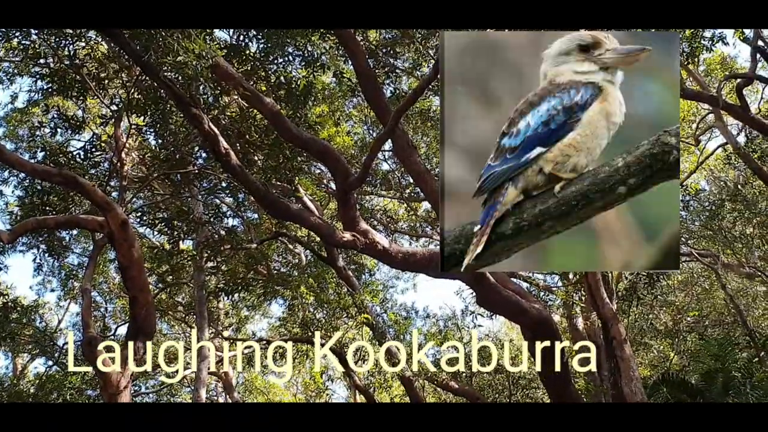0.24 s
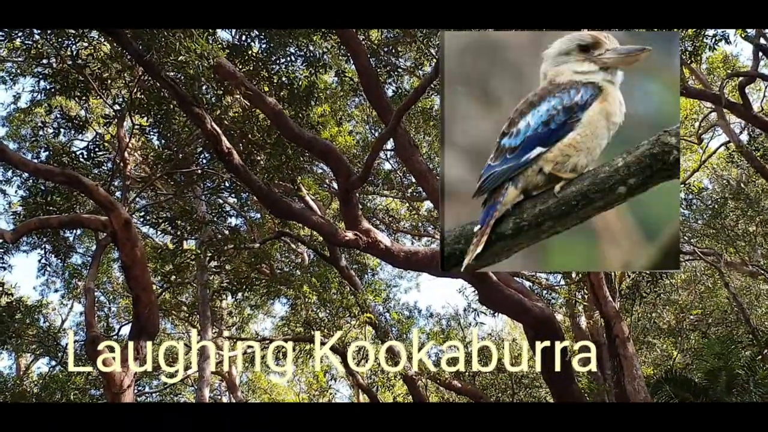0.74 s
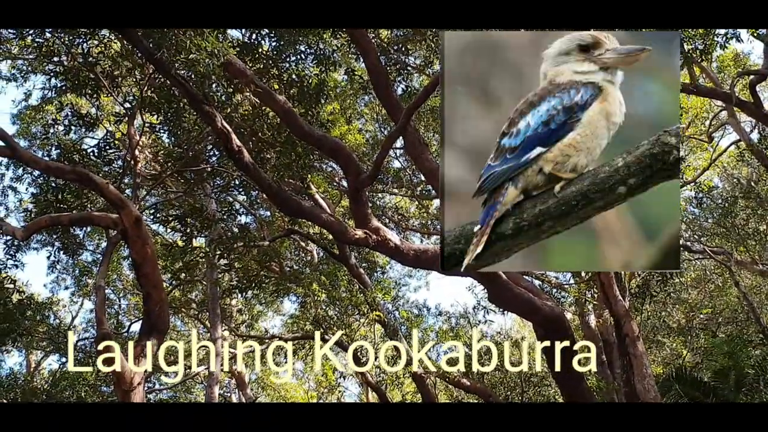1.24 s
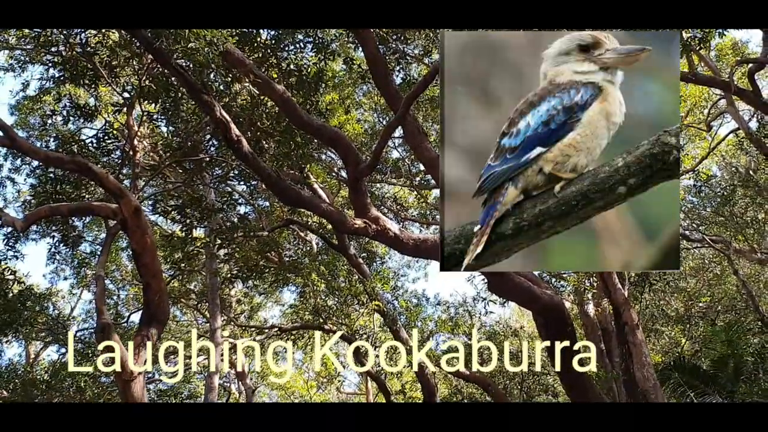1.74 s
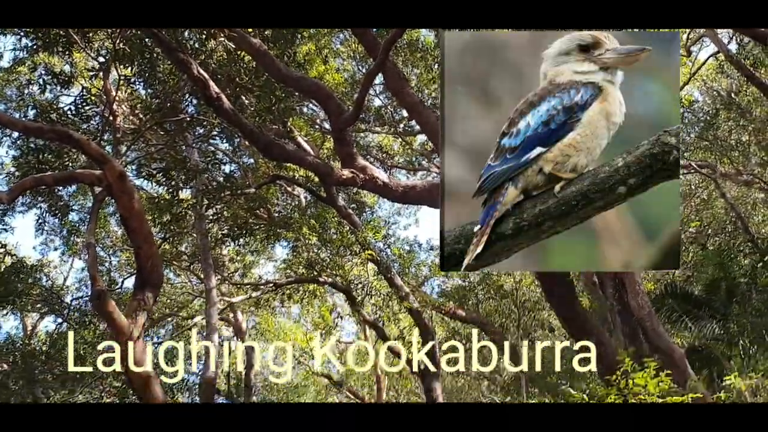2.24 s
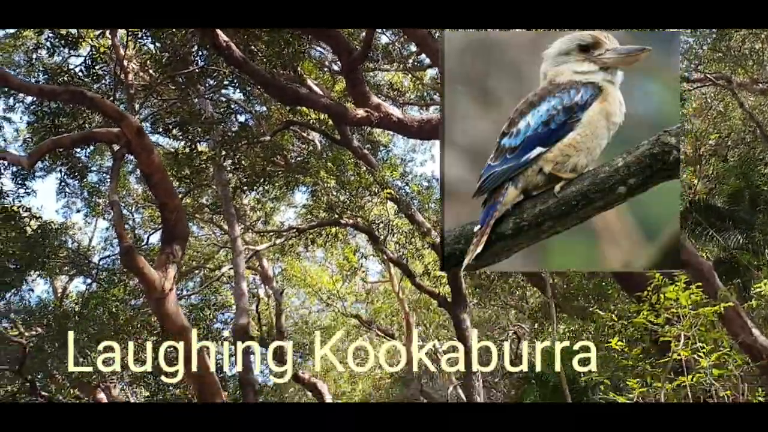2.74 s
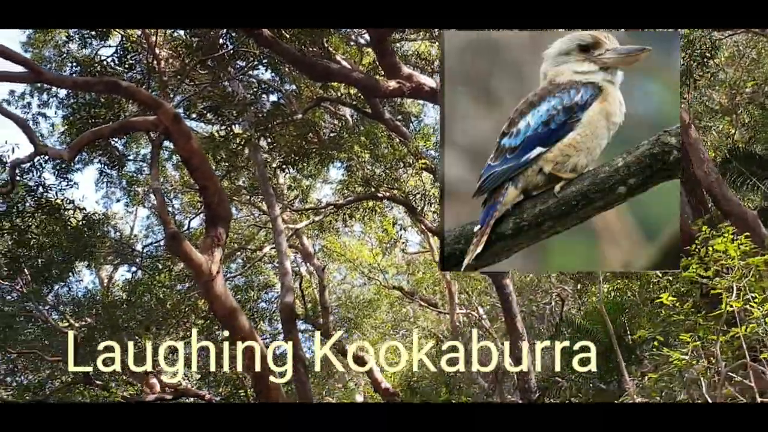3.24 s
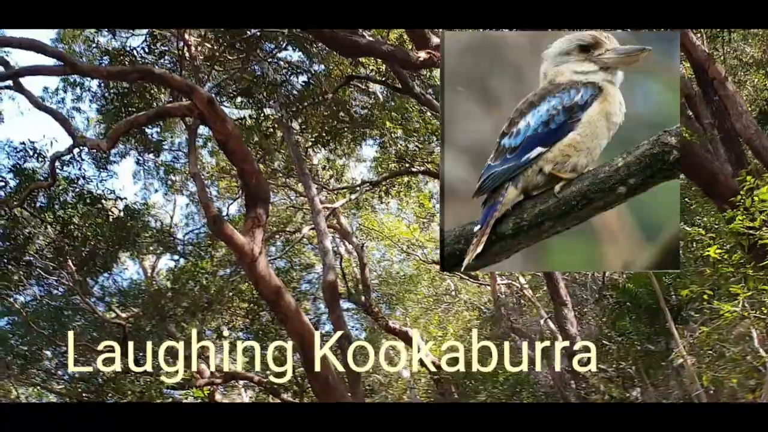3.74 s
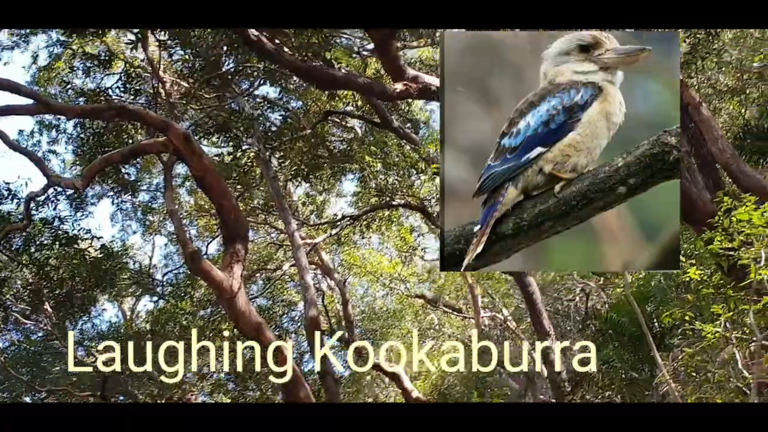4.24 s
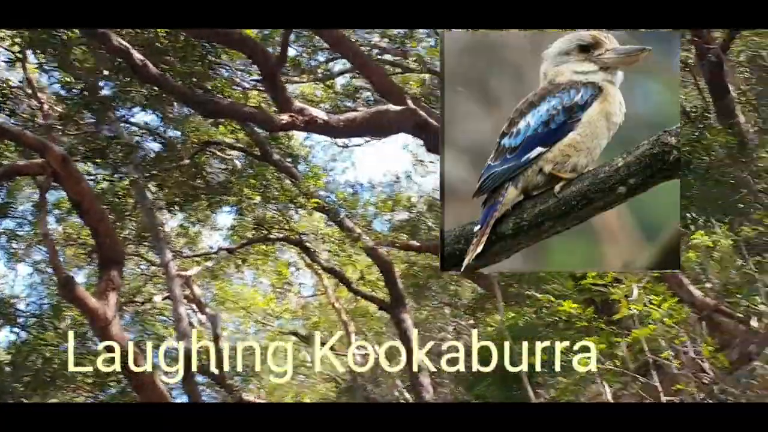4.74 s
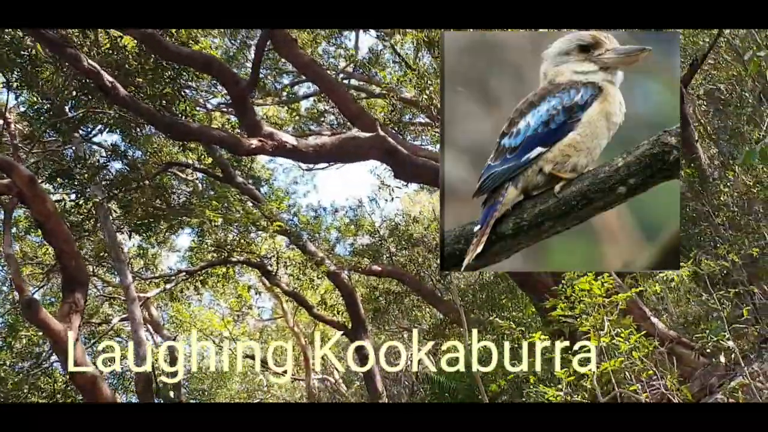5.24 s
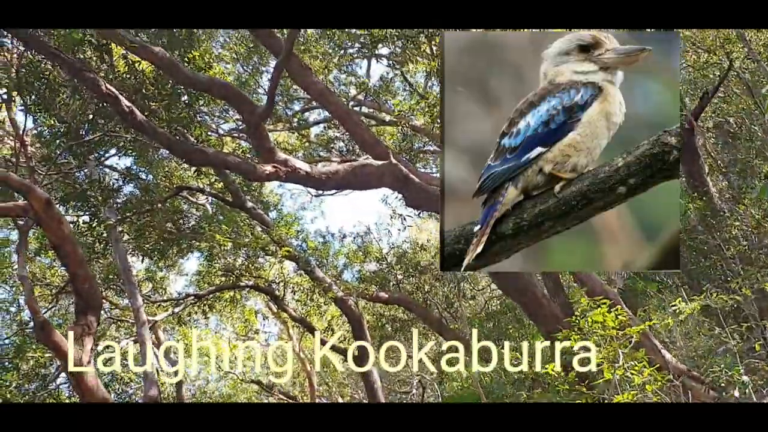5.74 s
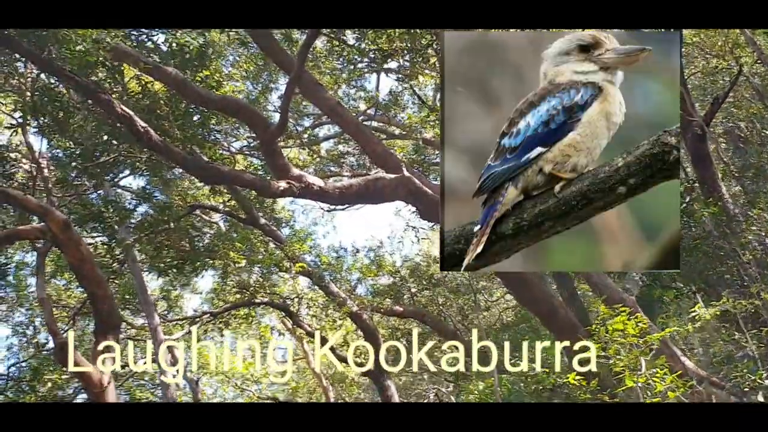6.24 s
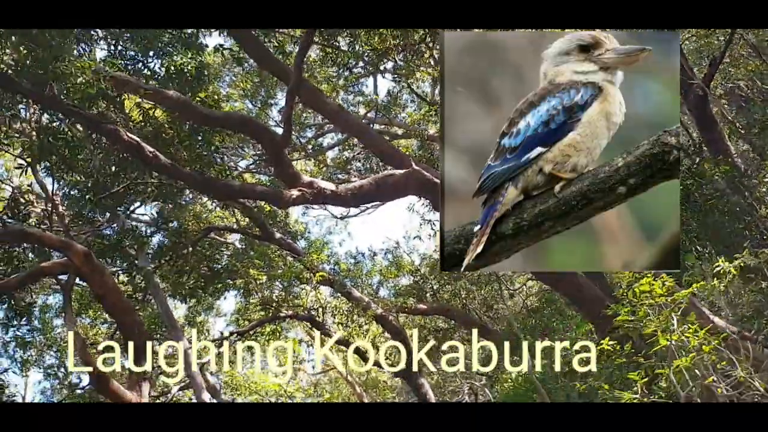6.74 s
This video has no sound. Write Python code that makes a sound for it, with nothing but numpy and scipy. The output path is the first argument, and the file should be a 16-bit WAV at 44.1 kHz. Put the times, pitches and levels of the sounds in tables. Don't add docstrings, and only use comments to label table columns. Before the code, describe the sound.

Harsh overlapping laughing bird calls ring off trees to the right, thinning to two falling hoots; a handling knock clunks close by early on.

```python
import sys
import numpy as np
from scipy import signal
from scipy.fft import rfft, irfft, next_fast_len
from scipy.io import wavfile
from scipy.ndimage import uniform_filter1d, map_coordinates

SR = 44100
rng = np.random.default_rng(int(sys.argv[2]) if len(sys.argv) > 2 else 0)


def generate_wav(sig):
    pcm = np.round(np.clip(np.atleast_2d(sig).T, -1, 1) * 32767).astype(np.int16)
    wavfile.write(sys.argv[1], SR, pcm)


def invert_db(x):
    u = np.asarray(x, float) / 20
    return 10 ** u


N = 308700
TIME = np.arange(N) / SR


def unit(x):
    return x / np.sqrt(np.mean(x ** 2) + 1e-20)


def along(points, hz):
    f, v = np.transpose(points)
    return np.interp(np.log(hz + 1), np.log(f + 1), v)


def wobble(rate):
    coarse = TIME[::SR // 4000]
    knots = rng.standard_normal(int(N * rate / SR) + 4)
    return np.interp(TIME, coarse, map_coordinates(knots, [coarse * rate]))


def filtered(x, response):
    m = next_fast_len(N + 8192)
    return irfft(rfft(x, m) * response(np.fft.rfftfreq(m, 1 / SR)), m)[..., :N]


def coloured(spectrum, channels):
    noise = rng.standard_normal((channels, N))
    return unit(filtered(noise, lambda hz: invert_db(along(spectrum, hz))))


def throat_response(modes):
    def response(f):
        total = 0
        for k, (centre, width, db) in enumerate(modes):
            resonance = 1j * f * width / (centre * centre - f * f + 1j * f * width)
            total = total + (-1) ** k * invert_db(db) * resonance ** 2
        return total
    return response


def shaped(rows, shape, high_hz=None, bright_db=0):
    step = 2 ** (1 / 12)
    notes = []
    for row in rows:
        if high_hz:
            start, length, low, effort, bright = row
            high = high_hz
        else:
            start, length, low, effort, high = row
            bright = bright_db
        notes.append([(start + share * length, low * step ** bend, high * step ** lift, effort + db, bright + shine)
                      for share, bend, lift, db, shine in shape])
    return notes


def voice(notes, tone, throat, jitter_hz, throb_hz, throb, air_db, rise, fall):
    s, *cols = np.transpose([row for note in notes for row in note])
    low_hz, high_hz, effort_db, bright_db = [
        uniform_filter1d(np.interp(TIME, s, c), size=SR // 30) for c in cols]
    sounding = 0
    for note in notes:
        opening = np.clip((TIME - note[0][0]) / rise + .5, 0, 1)
        closing = np.clip((note[-1][0] - TIME) / fall + .5, 0, 1)
        sounding = sounding + opening * closing

    cycles = np.cumsum(throb_hz * (1 + .15 * wobble(30))) / SR
    starts = np.array([note[0][0] for note in notes])
    latest = starts[np.clip(np.searchsorted(starts, TIME + rise) - 1, 0, None)]
    beat = np.cos(2 * np.pi * (cycles - np.interp(latest + rise, TIME, cycles)))
    flap = 1 - throb * (1 - beat)

    low, high = [2 * np.pi * np.cumsum(hz + hz / low_hz * jitter_hz * wobble(160)) / SR
                 for hz in (low_hz, high_hz)]
    body = sum(invert_db(db + 2.68 * wobble(60)) * np.sin(k * low) for k, db in tone[0])
    shine = sum(invert_db(db + 4.5 * wobble(90)) * np.sin(k * high + .42 * k * k * wobble(330)) for k, db in tone[1])
    breath = (2.9 + .5 * flap) * rng.standard_normal(N)
    air = unit(filtered(breath, throat_response(throat))) * invert_db(air_db)
    return sounding * invert_db(effort_db) * (2.06 * flap * body + invert_db(bright_db) * (0.47 * shine + air))


# pitch_hz, t60_s
TRUNK_DECAY = [(500, 1), (1300, 1), (2200, 1), (5000, 0.99), (10000, 0.22)]


def woodland(x, pan_db, wet_db):
    near, near_t60 = 2.2, .15
    out = np.zeros((2, N + 2 * SR))
    hop = SR // 5
    fade = np.hanning(2 * hop)
    padded = np.pad(x, (hop, 2 * hop))
    for i in range(0, N + hop, hop):
        noise = rng.standard_normal((2, SR // 2))
        hz, t, z = signal.stft(noise, SR, nperseg=256)
        decay = invert_db(-60 * t / along(TRUNK_DECAY, hz)[:, None]) + near * invert_db(-60 * t / near_t60)
        tail = signal.istft(z * decay, SR, nperseg=256)[1]
        tail = tail / np.linalg.norm(tail[0])
        wet = signal.fftconvolve((padded[i:i + 2 * hop] * fade)[None], tail, axes=1)
        out[:, i:i + wet.shape[1]] += wet
    scatter = out[:, hop - 130:hop - 130 + N]
    direct = np.array([np.roll(x, 1), x])
    return (direct + invert_db(wet_db) * scatter) * invert_db([[pan_db / 2], [-pan_db / 2]])


# pitch_hz, level_db
BACKGROUND_COLOUR = [(20, -48), (50, 0.5), (120, -9), (300, -10.5), (900, -9.5), (1300, 4.5), (2500, -7),
                     (4500, -25.5), (7500, -35.5), (11000, -30.5), (15000, -30.5), (17000, -120)]


def bush():
    a, b = coloured(BACKGROUND_COLOUR, channels=2)
    return invert_db(-41 + 0.64 * wobble(1.5)) * np.array([0.69 * a + 0.3 * b, b])


# start_s, length_s, low_membrane_hz, effort_db, brightness_db
RASPS = [
    (-.3, 0.35, 1155, -24, -1.5),
    (.4, .43, 1250, -21.5, -6.5),
    (1.15, .4, 1177, -21, -3.5),
    (1.85, 0.39, 1207, -21.5, -5.5),
    (2.5, .45, 1184, -21.5, -4.5),
    (3.15, .47, 1214, -19.5, -7),
    (3.96, 0.33, 1198, -17.5, -8),
    (4.7, 0.37, 1163, -19, -7),
]
# start_s, length_s, low_membrane_hz, effort_db,
# brightness_db
CROAKS = [
    (5.745, 0.083, 1183, -20.5, -1.5),
    (6.165, 0.104, 1172, -24, 0),
]
# share_of_length, low_bend_semitones, high_bend_semitones, effort_db, brightness_db
DRAWL = [(0, 0, 0.026, 0.5, -2.5), (.5, -.8, 0.009, 1, -0.5), (.75, -1.1, .6, -4.5, 5),
         (1, -1.6, 1.1, -14, 12.5)]
# share_of_length, low_bend_semitones, high_bend_semitones, effort_db, brightness_db
SINK = [(0, 0, -.9, 3.5, -5.5), (.5, -2.5, 0, -11.5, -2), (1, -3.5, 0, -26.5, 21)]
# multiple, level_db
RASP_TONE = [
    [(.72, -13.5), (.85, -10), (1, 1)],
    [(1, -5.5), (1.13, -16.5), (1.4, -12.5), (1.95, -13)],
]
# pitch_hz, width_hz, level_db
RASP_THROAT = [(1066, 495, 9.5), (2686, 760, 5), (3520, 640, 1), (4903, 794, 3.5), (8030, 1370, -21),
               (9510, 810, -17.5), (12200, 2600, -32)]


def rasping_bird():
    notes = shaped(RASPS, DRAWL, high_hz=2540) + shaped(CROAKS, SINK, high_hz=3060)
    rasp = voice(sorted(notes), RASP_TONE, RASP_THROAT, jitter_hz=24, throb_hz=40, throb=.62,
                 air_db=1, rise=.025, fall=.07)
    return invert_db(-6.5) * woodland(rasp, pan_db=-5.5, wet_db=1)


# start_s, left_level_db, right_level_db, ring_hz, sharpness_0_to_1
KNOCKS = [
    (.0664, -25, -21, 2000, 1),
    (1.1128, -2, -20, 1450, 1),
    (1.1309, 2, -12, 1300, .25),
    (1.1328, 3, -12, 1600, .25),
    (6.826, -40, -38, 2000, 1),
]
# start_s, level_db
RUB = [
    (6.972, -75),
    (6.982, -36.5),
    (6.99, -41.5),
    (7, -48),
]
# pitch_hz, level_db
RUB_COLOUR = [(150, -120), (300, 4.5), (600, -7.5), (1500, -13.5), (5000, -23.5), (8000, -23), (11000, -12),
              (14500, -12.5), (17000, -120)]


def handling():
    out = np.zeros((2, N))
    for start, left_db, right_db, hz, sharp in KNOCKS:
        t = np.clip(TIME - start, -.01, .3)
        tick = np.cos(2 * np.pi * hz * t + 1.3) + .5 * np.cos(2 * np.pi * 2.7 * hz * t)
        tick += 0.46 * sharp * np.cos(2 * np.pi * 7.1 * hz * t) * np.exp(-(t / 0.00017) ** 2)
        thud = invert_db(-29 - 60 * t / 0.11) * np.sin(2 * np.pi * 75 * t)
        thud += invert_db(-32 - 60 * t / .03) * np.sin(2 * np.pi * 320 * t)
        thud += invert_db(-25 - 60 * t / .1) * np.sin(2 * np.pi * 165 * t)
        knock = .6 * np.exp(-(t / .00035) ** 2) * tick + .5 * (t > 0) * thud
        out += invert_db([[left_db], [right_db]]) * knock
    rub_db = np.interp(TIME, *np.transpose(RUB), left=-120) + 4.3 * wobble(240)
    rub = invert_db(rub_db) * coloured(RUB_COLOUR, channels=2)
    return out + rub * invert_db([[-5], [3]])


# start_s, length_s, left_level_db,
# right_level_db
PUFFS = [(0.071, 0.082, -38.5, -45.5), (0.264, 0.05, -22.5, -38.5), (0.615, 0.1, -38.5, -59),
         (1.991, 0.075, -41.5, -59), (2.403, 0.047, -46, -67), (2.562, 0.12, -42.5, -51.5),
         (3.162, 0.096, -53, -62), (3.528, 0.1, -65, -55), (3.662, 0.095, -47, -66),
         (4.091, 0.093, -45, -73), (4.272, 0.055, -55, -52), (4.403, 0.12, -75, -51),
         (4.584, 0.088, -46, -49), (4.751, 0.054, -47, -47), (5.668, 0.078, -44.5, -61),
         (5.835, 0.11, -41, -49.5), (6.121, 0.13, -42.5, -49.5), (6.782, 0.088, -42.5, -51),
         (6.893, 0.058, -44, -48.5), (1.131, 0.029, -19, -45)]
# start_s, half_length_s, level_db
GUSTS = [
    (.28, 0.053, -48),
    (.63, 0.072, -51),
    (1.96, 0.096, -53),
    (4.111, 0.063, -56),
    (5.36, 0.072, -51),
]
# pitch_hz, level_db
BUFFET = [(25, -42), (42, -3), (65, -5), (100, -12.5), (190, -21), (450, -27.5), (800, -27.5), (1300, -120)]


def wind():
    swell = 0
    for start, length, left_db, right_db in PUFFS:
        swell = swell + invert_db([[left_db], [right_db]]) * np.exp(-((TIME - start) / (.5 * length)) ** 2)
    eddies = coloured(BUFFET, channels=2)
    a, b = eddies / np.sqrt(0.054 + np.abs(uniform_filter1d(eddies ** 2, SR // 25)))
    strength = invert_db(1.5) * swell + invert_db(-72.0 + 4.6 * wobble(3.2))
    gusts = sum(invert_db(db) * np.exp(-((TIME - start) / length) ** 2) for start, length, db in GUSTS)
    leaves = gusts * coloured([(5000, -30), (9000, 4), (15000, -8.0)], channels=2) * invert_db([[-3], [3]])
    return strength * np.array([a, -.8 * a + 2.0 * b]) + leaves


# start_s, length_s, low_membrane_hz, effort_db, high_membrane_hz
SNAPS = [
    (2.69, 0.062, 1700, -25.5, 3570),
    (3.77, 0.078, 2167, -23, 3740),
    (4.06, 0.094, 1590, -16, 3800),
    (4.37, 0.11, 1859, -16.5, 4173),
    (6.82, 0.061, 1804, -38.5, 3800),
]
# start_s, length_s, low_membrane_hz, effort_db, high_membrane_hz
YAPS = [
    (.115, 0.11, 2080, -16, 4170),
    (.235, .095, 2271, -19, 3985),
    (3.655, 0.1, 1906, -14, 3750),
    (4.645, 0.086, 1674, -21.5, 4260),
    (4.96, 0.2, 1702, -21, 3900),
    (5.27, .14, 1680, -18, 4116),
    (6.39, 0.09, 1780, -27.5, 3817),
    (6.6, .1, 1878, -35.5, 4280),
]
# start_s, length_s, low_membrane_hz, effort_db, high_membrane_hz
GRUNTS = [
    (2.36, .07, 2083, -24, 4050),
    (3.03, .07, 2031, -25.5, 4000),
    (4.5, .08, 1920, -32, 3800),
    (5.94, 0.078, 1718, -21.5, 3520),
]
# start_s, length_s, low_membrane_hz, effort_db, high_membrane_hz
SQUEAKS = [
    (.385, .09, 2197, -31.5, 3749),
]
# share_of_length, low_bend_semitones, high_bend_semitones, effort_db, brightness_db
SNAP = [(0, -.2, 0.0038, -3, -3), (0.499, 0, .3, -3, 3), (1, .3, 0, -13.5, -11)]
# share_of_length, low_bend_semitones, high_bend_semitones, effort_db, brightness_db
YAP = [(0, 0.084, 0, -8.5, 0.6), (.5, 0.015, 0, 1.5, 1), (0.998, -.1, -.6, -15.5, -0.82)]
# multiple, level_db
BARK_TONE = [
    [(1 / 3, -27), (2 / 3, -13), (.87, -6), (1, 0), (1.13, -4), (1.32, -8)],
    [(.9, -4), (1, 0), (1.33, -11)],
]
# pitch_hz, width_hz, level_db
BARK_THROAT = [(1050, 685, 1.5), (1850, 820, 8), (2900, 1800, -9), (4050, 920, 3.5), (5840, 1220, -7),
               (7250, 4500, -26), (9500, 4200, -32)]


def barking_bird():
    notes = shaped(GRUNTS, SNAP, bright_db=-6.5) + shaped(SNAPS, SNAP)
    notes += shaped(YAPS, YAP) + shaped(SQUEAKS, YAP, bright_db=11)
    bark = voice(sorted(notes), BARK_TONE, BARK_THROAT, jitter_hz=60, throb_hz=120, throb=.3,
                 air_db=-1, rise=.025, fall=.045)
    return invert_db(-8.5) * woodland(bark, pan_db=-8.5, wet_db=1)


# start_s, length_s, low_membrane_hz, effort_db, brightness_db
STRUCK = [
    (.195, 0.082, 1431, -15.5, -3.5),
    (.715, 0.063, 1300, -15, -7),
    (1.745, 0.095, 1293, -8.5, -9),
    (1.85, .1, 1290, -10.5, -10),
    (2.11, 0.088, 1280, -8.5, -11),
    (2.445, 0.081, 1297, -9, -7.5),
    (2.81, 0.094, 1274, -9.5, -11),
    (3.175, 0.084, 1286, -9.5, -9),
    (5.33, 0.084, 1307, -19, -0.5),
]
# start_s, length_s, low_membrane_hz, effort_db, brightness_db
SWELLING = [
    (.585, 0.087, 1309, -14.5, -11.5),
    (.962, 0.0487, 1336, -29.5, 2),
    (1.012, 0.1488, 1323, -12, -7),
    (1.395, 0.1, 1326, -5, -10),
    (2.23, 0.13, 1300, -11.5, -9),
    (2.65, .11, 1300, -13, -9.5),
    (3.045, 0.12, 1297, -9.5, -14),
    (3.46, 0.1235, 1291, -10, -13),
    (3.87, .1, 1270, -9.5, -12),
    (6.77, 0.081, 1394, -25.5, -32),
]
# start_s, length_s, low_membrane_hz, effort_db, brightness_db
CLOSING = [
    (5.665, .14, 1331, -6.5, -19),
    (6.085, .13, 1341, -5.5, -20),
]
# share_of_length, low_bend_semitones, high_bend_semitones, effort_db, brightness_db
STRIKE = [(0, 0, 0, 1, -3), (.4, 0.034, 0, -1, 1), (.8, -0.0935, -.1, -7.5, 8), (1, -.2, -.2, -12.5, 13)]
# share_of_length, low_bend_semitones, high_bend_semitones, effort_db, brightness_db
SWELL = [(0, 0, -0.23, -8.5, 1), (.5, 0.026, 0.022, -0.5, 0.5), (1, -0.33, -0.37, -13, 13.5)]
# share_of_length, low_bend_semitones, high_bend_semitones, effort_db, brightness_db
BREAK = [(0, -0.3, 0.0064, -12, -2), (.32, 0, -0.099, -3.5, 3.5), (.65, -.5, 0, 0, -3.5),
         (1, -6.5, -.8, -32.5, 27.5)]
# multiple, level_db
SWELLING_TONE = [
    [(1, -2.5)],
    [(1, -4), (1.47, -13), (1.95, -8.5), (3, -36), (3.6, -33.5)],
]
# multiple, level_db
STRUCK_TONE = [
    [(1, -3.5)],
    [(1, -8), (1.5, -8), (1.97, -5.5)],
]
# pitch_hz, width_hz, level_db
HOOT_THROAT = [(1300, 320, 23), (2665, 255, 14.5), (3800, 1800, -1), (4630, 2200, 0), (8600, 300, -47),
               (9100, 300, -25.5)]


def hooting_bird():
    manner = dict(jitter_hz=16, throb_hz=39, throb=.4, air_db=-3, rise=.012, fall=.03)
    swelling = shaped(SWELLING, SWELL, high_hz=2725)
    struck = shaped(STRUCK, STRIKE, high_hz=2574) + shaped(CLOSING, BREAK, high_hz=2725)
    hoot = voice(sorted(swelling), SWELLING_TONE, HOOT_THROAT, **manner)
    hoot = hoot + voice(struck, STRUCK_TONE, HOOT_THROAT, **manner)
    return invert_db(-3.5) * woodland(hoot, pan_db=-8.5, wet_db=-3)


def gain_db():
    duck_s, attack_s, hold_s, recover_s = 1.1132, .0014, 0.11, 1.1
    ducked_db, after_db = -12.5, -3.5
    back = 1 - np.exp(-np.clip(TIME - duck_s - hold_s, 0, None) / recover_s)
    ducked = np.clip((TIME - duck_s) / attack_s, 0, 1)
    before = 3.5 * TIME
    easing = 0.86 * np.clip(TIME - 5.97, 0, None)
    after = ducked_db + (after_db - ducked_db) * back - easing
    return (1 - ducked) * before + ducked * after


def scene():
    return bush() + rasping_bird() + handling() + wind() + barking_bird() + hooting_bird()


def band_limit(x):
    return signal.sosfilt(signal.butter(12, 16650, fs=SR, output="sos"), x)


def record(dry):
    x = dry * invert_db(gain_db())
    x = x / (1 + np.abs(x / .95) ** 4) ** .25
    x = filtered(x, lambda hz: invert_db(-40 * np.clip((hz - 15200) / 500, 0, 1)))
    return band_limit(x)


dry = scene()
out = record(dry)
generate_wav(out)
```